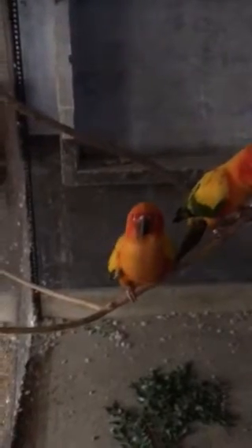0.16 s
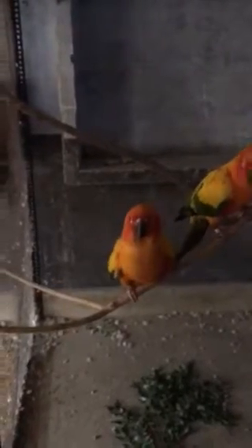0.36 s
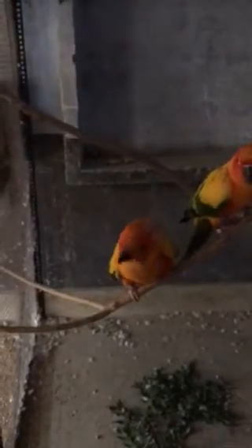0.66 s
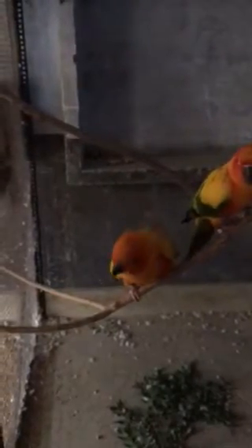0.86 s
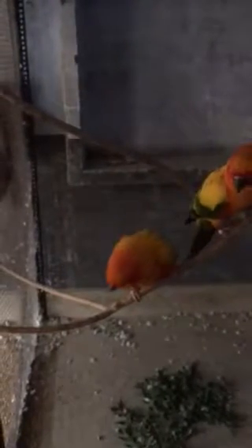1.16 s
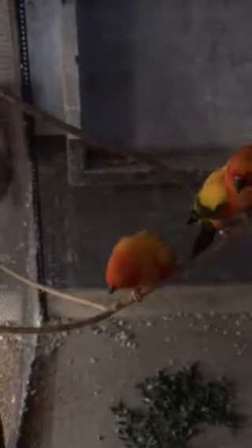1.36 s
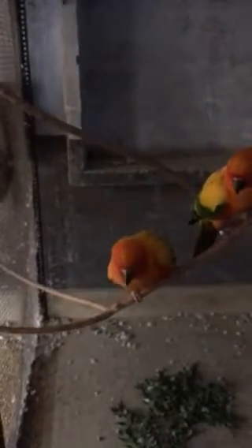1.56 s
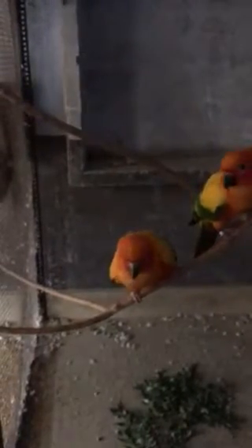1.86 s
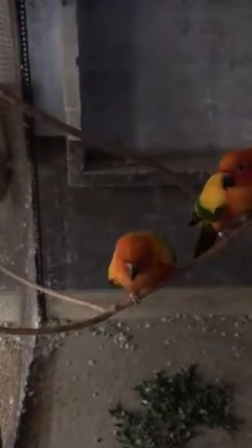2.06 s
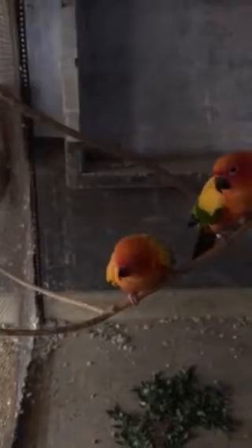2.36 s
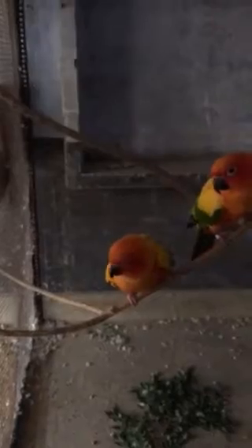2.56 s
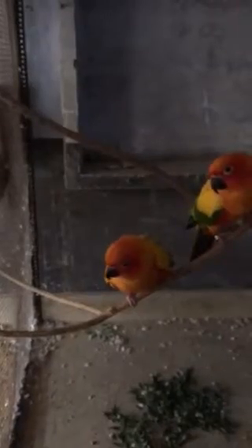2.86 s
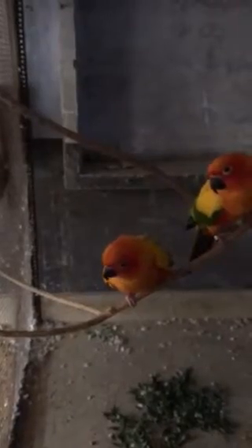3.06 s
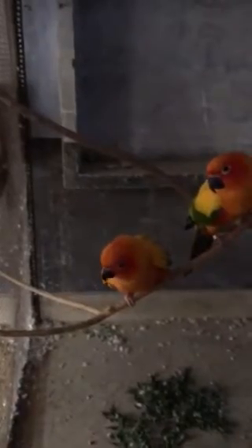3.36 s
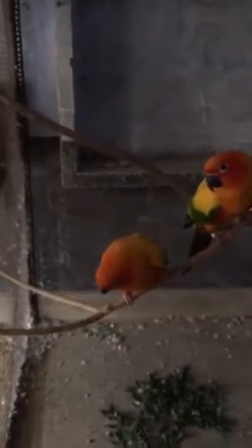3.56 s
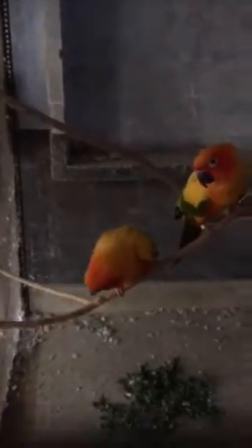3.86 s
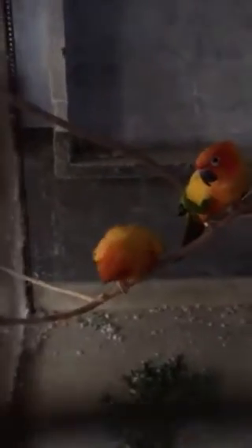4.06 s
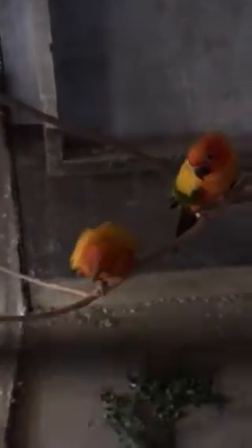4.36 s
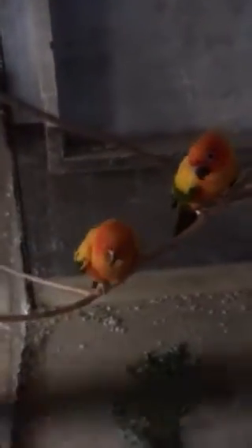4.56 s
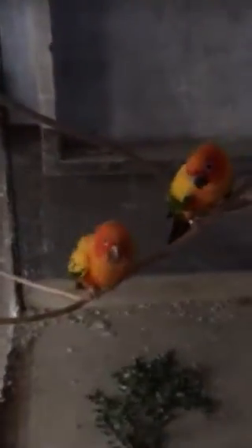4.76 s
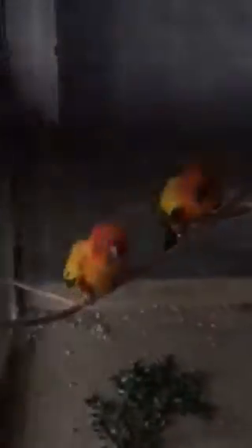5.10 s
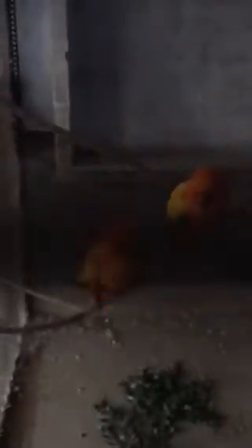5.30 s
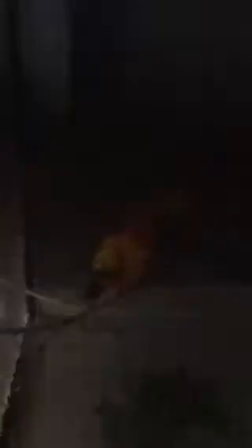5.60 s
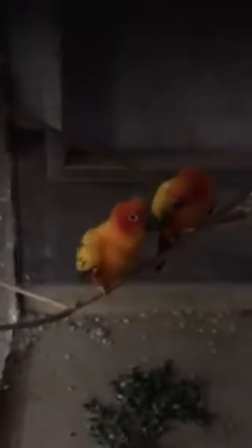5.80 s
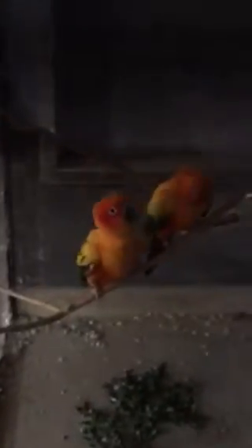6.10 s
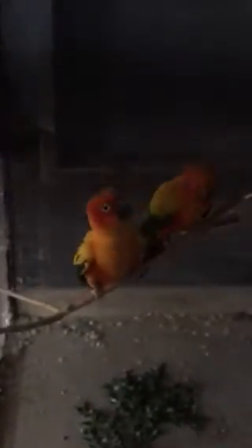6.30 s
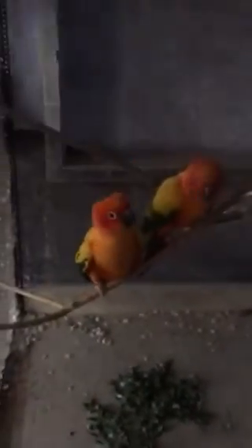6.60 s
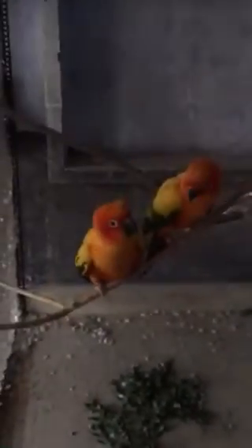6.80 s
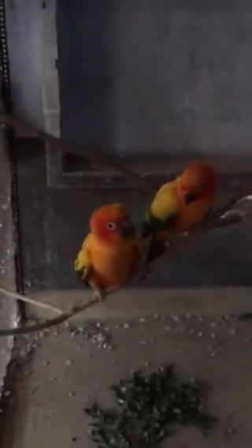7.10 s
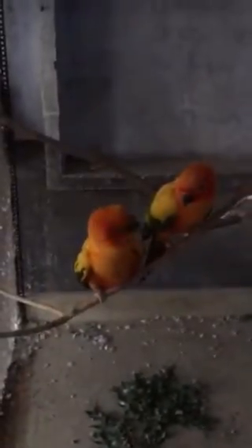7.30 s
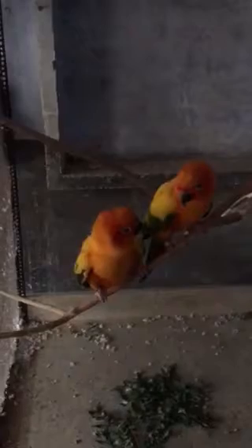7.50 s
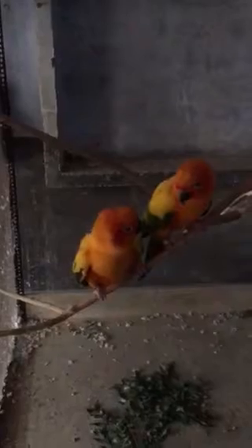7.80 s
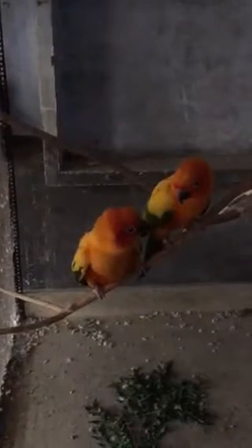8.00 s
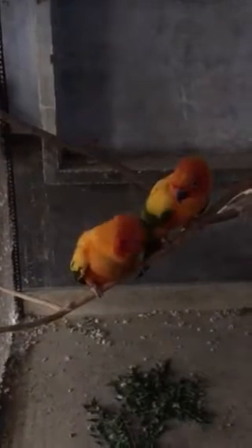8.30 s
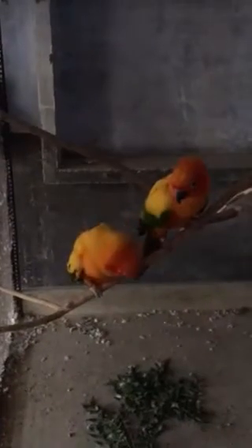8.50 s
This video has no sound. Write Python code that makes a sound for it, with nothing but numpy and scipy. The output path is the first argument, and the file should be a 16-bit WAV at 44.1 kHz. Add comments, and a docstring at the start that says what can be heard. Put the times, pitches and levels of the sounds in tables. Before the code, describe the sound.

Two conures call in a hard-walled enclosure inside an echoing building, over soft moving air, uneven low rumble and faint motor hum. A call's dying end opens, with faint mutters at 0.2 and 0.6 s. A piercing squawk cracks at 1.3, another with high chirps at 1.65, and a rough one at 2.0. A sharp beak click at 2.75 precedes a squawk; more follow at 3.05 to 3.45. From 3.8 to 4.3 calls crowd together, with a nasal yap and a clear rising whistle. After a lull, squawks and chirps burst at 5.4 to 5.55. A stuttering low croak at 5.9 leads into soft mutters and falling mews until 6.95, broken by a squawk at 6.35. Bright screeches hit at 7.0, a whistle rises at 7.2, and harsh calls follow at 7.4 to 7.7. Two buzzy yaps come near 8.0, then reverberation fades, with a faint click at 8.5.

```python
"""In a hard-walled enclosure inside an echoing building, two conures chatter on a perch over ventilation.
Squawks, chirps, yaps and small talk are harmonic pulses, shaken by roughness, breathed on and throat-filtered.
Two rising whistles are nearly pure slurs; a stuttering croak is a run of low bursts; beak clicks are ringing noise.
Filtered noise makes the moving air and duct rumble, and wavering sines make the hum."""
import sys
import numpy as np
from scipy import signal
from scipy.fft import rfft, irfft, next_fast_len
from scipy.io import wavfile
from scipy.ndimage import map_coordinates

SR = 44100
rng = np.random.default_rng(int(sys.argv[2]) if len(sys.argv) > 2 else 0)


def int16_out(signal):
    """Quantize to a 16-bit WAV file."""
    q = np.round(np.clip(np.atleast_2d(signal).T, -1, 1) * 32767)
    wavfile.write(sys.argv[1], SR, q.astype(np.int16))


N = 381465
TIME = np.arange(N) / SR


def from_db(db):
    """Decibels to gain."""
    return 10 ** (np.asarray(db) / 20)


def rms_one(x):
    """Scale to unit rms."""
    return x / np.sqrt(np.mean(x ** 2) + 1e-20)


def at_hz(points, hz):
    """Read a table on a log-frequency axis."""
    table = np.array(points)
    return np.interp(np.log(np.maximum(hz, 1)), np.log(table[:, 0]), table[:, 1])


def level_curve(points):
    """Gain in dB over the whole scene, in straight lines between the table's times."""
    return np.interp(TIME, *np.transpose(points))


def colour(x, db_at):
    """Filter by a gain in dB given as a function of frequency."""
    size = next_fast_len(len(x))
    hz = np.arange(size // 2 + 1) * SR / size
    return irfft(rfft(x, size) * from_db(db_at(hz)), size)[:len(x)]


def low_cut_db(hz, edge_hz, order):
    """Slope of a high-pass in dB."""
    return -10 * np.log10(1 + (edge_hz / np.maximum(hz, 1)) ** (2 * order))


def waver(size, rate):
    """Smooth random drift of spread 1, changing about rate times a second."""
    knots = rng.standard_normal(16384)
    return map_coordinates(knots, [np.arange(size) * rate / SR], order=3, mode="wrap")


def add(out, start, sound):
    """Mix a sound in at its time in seconds."""
    at = max(round(start * SR), 0)
    out[at:at + len(sound)] += sound[:N - at]


# tone of the moving air: f/Hz, gain/dB
AIR_SPECTRUM = [(15, -38), (25, -7), (99, 3), (133, -8), (198, -10.5), (227, -13.5), (322, -13), (848, -22),
                (1300, -24), (2060, -30), (2770, -32.5), (3630, -35), (4040, -36), (8810, -43.5),
                (15500, -51)]
# course of the moving air, before its trim: t/s, level/dB
AIR_COURSE = [(0, -50), (6.55, -51.5), (6.7, -45.5), (7.4, -52.5), (8.65, -51.5)]
# rough, irregular level of the low rumble: t/s, level/dB
RUMBLE_COURSE = [(0.0, -56), (1.16, -48), (1.2, -44), (1.59, -62), (2.36, -48.5), (2.43, -62), (3.06, -56),
                 (3.13, -75), (4.26, -60), (7.76, -67), (8.12, -56), (8.65, -60)]
# partials of the motor hum, about which each wavers: f/Hz, level/dB
HUM_PARTIALS = [(51, -65.5), (100.3, -55.5), (200, -64)]


def ventilation(air_trim_db=3, rumble_hz=72, hum_waver_db=3.5, hum_waver_rate=9, hum_slip_rad=0.85):
    """Broad noise of moving air, a low noise band in the duct, and a motor hum unsteady in level and phase."""
    hiss = rng.standard_normal(N)
    air = rms_one(colour(hiss, lambda hz: at_hz(AIR_SPECTRUM, hz) + low_cut_db(hz, 109.8, order=3)))
    air = air * from_db(air_trim_db + level_curve(AIR_COURSE))

    duct = signal.butter(2, [0.57 * rumble_hz, rumble_hz], "band", fs=SR, output="sos")
    rumble = rms_one(signal.sosfilt(duct, rng.standard_normal(N)))
    rumble = rumble * from_db(level_curve(RUMBLE_COURSE))

    hum = np.zeros(N)
    for hz, level_db in HUM_PARTIALS:
        gain = from_db(level_db + hum_waver_db * waver(N, hum_waver_rate))
        slip = hum_slip_rad * waver(N, hum_waver_rate)
        hum += gain * rms_one(np.sin(2 * np.pi * hz * TIME + slip))
    return air + rumble + hum


# ring of the building, time to fall 60 dB: f/Hz, t60/s
HALL_RING = [(1000, 2.4), (2500, 1.19), (4000, 0.91), (6000, 0.82), (9000, 0.59), (15000, 0.29)]


def enclosure(near_db=-2, near_t60=0.23, near_gap_s=.002, echoes_per_s=2500, hall_db=-7, hall_build_s=0.0077):
    """Echo response: quick reflections off the near walls, then the building's long tail, dying sooner in the treble."""
    t = TIME[:2 * SR]
    sparse = rng.standard_normal(len(t)) * (rng.random(len(t)) < echoes_per_s / SR)
    near = sparse * (t > near_gap_s) * from_db(-60 * t / near_t60)

    # the tail is noise split into bands, each with its own decay
    white = rfft(rng.standard_normal(len(t)))
    hz = np.arange(len(white)) * SR / len(t)
    edges = np.geomspace(500, 20000, 15)
    hall = np.zeros(len(t))
    for low, high in zip(edges, edges[1:]):
        band = irfft(white * ((hz >= low) & (hz < high)))
        hall += band * from_db(-60 * t / at_hz(HALL_RING, np.sqrt(low * high)))
    hall = hall * (1 - np.exp(-t / hall_build_s))
    return (from_db(near_db) * rms_one(near) + from_db(hall_db) * rms_one(hall)) / np.sqrt(len(t))


# beak clicks, level at the onset: t/s, level/dB
BEAK_CLICKS = [(2.755, -23), (2.759, -22), (8.519, -45)]
# ring of the beak: f/Hz, gain/dB
BEAK_SPECTRUM = [(1000, -45), (3500, -16), (4800, -17), (5700, -3.5), (6250, -1.5), (7400, -21),
                 (10000, -29), (12500, -15), (15500, -28)]


def beak_clicks(t60=0.022):
    """The horn of the beak snaps and rings for a moment: coloured noise with a fast decay."""
    out, t = np.zeros(N), TIME[:SR // 20]
    for start, level_db in BEAK_CLICKS:
        snap = rms_one(colour(rng.standard_normal(len(t)), lambda hz: at_hz(BEAK_SPECTRUM, hz)))
        add(out, start, from_db(level_db - 60 * t / t60) * snap)
    return out


def syrinx(pitch):
    """Pulses of the vibrating membranes: up to 14 equal harmonics."""
    phase = 2 * np.pi * np.cumsum(pitch) / SR
    return rms_one(sum(np.sin(k * phase) * (k * pitch < SR / 2) for k in range(1, 15)))


# throat of the croak: f/Hz, gain/dB
CROAK_SPECTRUM = [(700, -2), (1100, -0.5), (2300, 5.5), (3100, -4.5), (3900, 2.5), (5500, -11),
                  (7000, -21.5), (14000, -39)]
# starts of the first and last burst, and the exponent that spreads out the later ones
CROAK_START_S, CROAK_END_S, CROAK_SLOWING = 5.908, 5.967, 1.2
CROAK_FIRST_BURST_S, CROAK_LAST_BURST_S = 0.003, .015
CROAK_HZ, CROAK_SAG_OCT = 1243, 0.196
# the level peaks at the crest, a fraction of the run, and falls off with the square of the distance
CROAK_DB, CROAK_CREST, CROAK_FADE_DB = -25, 0.45, 4.5


def croak(jitter=0.08, jitter_rate=1200, count=5):
    """Short low bursts, each starting abruptly; the run slows, sags in pitch, swells and fades."""
    out = np.zeros(N)
    for along in np.linspace(0, 1, count):
        start = CROAK_START_S + (CROAK_END_S - CROAK_START_S) * along ** CROAK_SLOWING
        size = int(np.interp(along, [0, 1], [CROAK_FIRST_BURST_S, CROAK_LAST_BURST_S]) * SR)
        level_db = CROAK_DB - CROAK_FADE_DB * (along - CROAK_CREST) ** 2
        pitch = CROAK_HZ * 2 ** (-CROAK_SAG_OCT * along)
        pulses = syrinx(pitch * (1 + jitter * waver(size, jitter_rate)))
        voice = rms_one(colour(pulses, lambda hz: at_hz(CROAK_SPECTRUM, hz)))
        burst = np.interp(np.linspace(0, 1, size), [0, .06, .75, 1], [0.16, 0.91, 0.82, 0.33])
        add(out, start, from_db(level_db) * voice * burst)
    return out


# rising whistles, level before the fades and room mix: t/s, top f/Hz, level/dB
RISING_WHISTLES = [(4.268, 2813, -28.5), (7.220, 3005, -23.5)]
# overtones 2 to 5 of a whistle before strain: level/dB relative to the fundamental
OVERTONES_DB = [-19, -28, -40, -35]
WHISTLE_RISE_S, WHISTLE_DROOP_S = .143, 0.0475
WHISTLE_RISE_OCT, WHISTLE_DROOP_OCT = .47, 0.225


def whistles(jitter=0.02, jitter_rate=300, attack_s=0.04, release_s=0.034, rise_ease=1.45,
             strain_db_per_oct=25, easy_hz=3000):
    """Nearly pure upward slurs that level off and droop; overtones open up as the pitch is strained higher."""
    out = np.zeros(N)
    t = np.arange(0, WHISTLE_RISE_S + WHISTLE_DROOP_S, 1 / SR)
    rise = WHISTLE_RISE_OCT * np.maximum(1 - t / WHISTLE_RISE_S, 0) ** rise_ease
    droop = WHISTLE_DROOP_OCT * np.maximum((t - WHISTLE_RISE_S) / WHISTLE_DROOP_S, 0) ** 2
    fade = np.clip(np.minimum(t / attack_s, (t[-1] - t) / release_s), 0, 1)
    for start, top_hz, level_db in RISING_WHISTLES:
        hz = top_hz * 2 ** -(rise + droop)
        phase = 2 * np.pi * np.cumsum(hz * (1 + jitter * waver(len(t), jitter_rate))) / SR
        overtones = sum(from_db(db) * np.sin(k * phase) for k, db in enumerate(OVERTONES_DB, 2))
        strain = from_db(strain_db_per_oct * np.log2(hz / easy_hz))
        tone = rms_one(np.sin(phase) + overtones * strain)
        add(out, start, tone * fade * from_db(level_db))
    return out


# fixed colour of the throat: f/Hz, gain/dB
THROAT_SPECTRUM = [(1300, -2.5), (1750, 0), (2400, 0), (3300, 2), (4500, 3), (6700, 0), (7600, -7),
                   (9600, -3), (10500, -8.5), (12500, -1.5), (14200, -12.5), (15800, -19)]


def syllable(length, level_db, pitch_hz, glide, rough, throat_hz, throat_db, treble_db,
             jitter=.06, jitter_rate=1000, wobble=.10, wobble_rate=140, flutter_db=3.5, flutter_rate=400,
             lock_rate=80, leak=0.44, resonance_width_hz=700, treble_edge_hz=6000,
             attack_s=0.021, swell=0.55, release=0.26):
    """One note; pressed hard, the syrinx turns chaotic: pitch and strength shake, harmonics smear into a screech."""
    size = int(length * SR)
    along = np.linspace(0, 1, size)
    pitch = pitch_hz * 2 ** (glide * (along - .5))
    # the membranes slip in and out of regular vibration
    chaos = rough * np.clip(1 + waver(size, lock_rate), 0, 2)
    shake = chaos * jitter * waver(size, jitter_rate) + rough * wobble * waver(size, wobble_rate)
    pulses = syrinx(pitch * np.exp(shake))
    # turbulent air escapes with every opening
    hiss = rms_one(rng.standard_normal(size) * np.sqrt(np.abs(pulses)))

    def throat_gain_db(hz):
        """Fixed colour, one movable resonance, a treble slope and a steep cut below the pitch."""
        resonance = throat_db / (1 + ((hz - throat_hz) / resonance_width_hz) ** 2)
        treble = treble_db * np.log2(np.maximum(hz / treble_edge_hz, 1))
        return at_hz(THROAT_SPECTRUM, hz) + resonance + treble + low_cut_db(hz, 0.92 * pitch.min(), order=12)

    voice = colour(pulses + (leak + .5 * chaos) * hiss, throat_gain_db)
    voice = rms_one(voice * from_db(flutter_db * rough * waver(size, flutter_rate)))
    # air pressure builds up to the crest, then drops, fastest at the very end
    crest = min(attack_s / length, .55)
    pressure = np.interp(along, [0, crest, 1], [0, 1, 0]) ** np.where(along < crest, swell, release)
    return from_db(level_db) * pressure * voice


# In all the call tables below, level is before the pressure envelope and room mix, and f is the mid-note pitch.
# soft rising mutters through a closed beak: t/s, level/dB, f/Hz, glide/octaves, roughness (0 = clear)
SOFT_MUTTERS = [(0.162, -45, 1097, 0.064, 0.85), (0.585, -45.5, 999, 0.055, .9),
                (6.055, -42, 1130, 0.13, .8), (6.178, -43, 1200, 0.067, 0.9), (6.548, -39, 1503, .42, 0.3),
                (6.800, -38.5, 1417, 0.21, .3)]
MUTTER_S, MUTTER_FOCUS_DB, MUTTER_TREBLE_DB_PER_OCT = 0.072, 13.5, -30
# soft, clear falling mews: t/s, level/dB, f/Hz, glide/octaves
SOFT_MEWS = [(6.417, -38.5, 1617, -0.21), (6.648, -35, 1743, -.17), (6.898, -36.5, 1752, -0.22)]
MEW_S, MEW_ROUGH, MEW_FOCUS_DB, MEW_TREBLE_DB_PER_OCT = .066, .13, 0.5, -27


def small_talk():
    """Quiet, dull notes: mutters rise, mews fall; the throat follows the second harmonic."""
    out = np.zeros(N)
    for start, level_db, pitch_hz, glide, rough in SOFT_MUTTERS:
        add(out, start, syllable(MUTTER_S, level_db, pitch_hz, glide, rough, 2 * pitch_hz,
                                 MUTTER_FOCUS_DB, MUTTER_TREBLE_DB_PER_OCT, treble_edge_hz=4200))
    for start, level_db, pitch_hz, glide in SOFT_MEWS:
        add(out, start, syllable(MEW_S, level_db, pitch_hz, glide, MEW_ROUGH, 2 * pitch_hz,
                                 MEW_FOCUS_DB, MEW_TREBLE_DB_PER_OCT, leak=0.33, treble_edge_hz=5150))
    return out


# nasal yaps, all on one pitch with a strong third harmonic: t/s, length/s, level/dB
NASAL_YAPS = [(4.173, 0.038, -27), (7.966, 0.032, -40.5), (8.019, .080, -26.5)]
YAP_HZ, YAP_GLIDE_OCT, YAP_ROUGH = 1316, -.11, 0.379
YAP_THROAT_HZ, YAP_FOCUS_DB, YAP_TREBLE_DB_PER_OCT = 4090, 16, -44


def yaps():
    """Low, buzzy notes, full up to a steep treble edge; the throat rings near the third harmonic."""
    out = np.zeros(N)
    for start, length, level_db in NASAL_YAPS:
        add(out, start, syllable(length, level_db, YAP_HZ, YAP_GLIDE_OCT, YAP_ROUGH, YAP_THROAT_HZ, YAP_FOCUS_DB,
                                 YAP_TREBLE_DB_PER_OCT, treble_edge_hz=10400, attack_s=0.01))
    return out


# clear notes, many of them inside a squawk; the first row is the dying end of a call already under way:
# t/s, length/s, level/dB, f/Hz, glide/octaves, gain around the second harmonic/dB (negative dulls it)
CLEAR_CHIRPS = [ (0.000, .060, -40, 1431, -.05, 10.5), (1.332, .018, -26, 3590, 0.0063, 23),
                (1.644, 0.043, -27, 2150, .015, 1.5), (1.686, 0.039, -24, 5016, -0.0063, 10.5),
                (3.033, .020, -34, 2420, 0.079, -2), (5.387, 0.039, -25, 2402, -0.048, 5.5),
                (5.494, 0.044, -35.5, 3330, -0.14, -11), (5.548, 0.029, -31, 1927, -0.14, -7),
                (5.553, 0.021, -27.5, 3300, 0.0048, 28), (7.046, 0.014, -20.5, 3260, -0.051, 26),
                (7.475, .043, -27.5, 3350, 0.048, 26), (7.507, 0.036, -28, 3670, .17, 3),
                (7.625, 0.1, -30.5, 2203, .22, 24), (8.032, 0.044, -31.5, 2510, -0.037, -8)]
CHIRP_ROUGH, CHIRP_TREBLE_DB_PER_OCT = 0.142, -9


def chirps():
    """The membranes vibrate almost regularly; the throat boosts or dulls the second harmonic."""
    out = np.zeros(N)
    for start, length, level_db, pitch_hz, glide, second_db in CLEAR_CHIRPS:
        add(out, start, syllable(length, level_db, pitch_hz, glide, CHIRP_ROUGH, 2 * pitch_hz, second_db,
                                 CHIRP_TREBLE_DB_PER_OCT, attack_s=0.017))
    return out


# harsh squawks: t/s, length/s, level/dB, f/Hz, glide/octaves, roughness (0 = clear), throat resonance f/Hz
HARSH_SQUAWKS = [ (1.299, 0.025, -27.5, 2600, -0.0064, 1.02, 4600),
                 (1.312, 0.029, -19.5, 2567, -0.000077, 1.02, 5950),
                 (1.632, 0.025, -33.5, 2300, 0.032, 0.87, 4300), (1.665, 0.054, -24.5, 2392, 0, 0.98, 4980),
                 (2.031, 0.042, -27.5, 2200, -0.13, 0.95, 4230),
                 (2.818, 0.046, -25.5, 2076, -0.1, .85, 4000),
                 (3.049, 0.087, -26.5, 2400, -0.062, 0.79, 6900), (3.137, .045, -27.5, 2440, 0, 1.13, 4170),
                 (3.328, .026, -34.5, 2080, 0.034, 0.55, 4100),
                 (3.463, 0.018, -36, 2102, 0.063, 0.35, 6600), (3.790, 0.065, -31.5, 2434, 0.096, .7, 2600),
                 (3.844, 0.09, -26.5, 2546, -0.045, .4, 5200), (4.145, 0.12, -27, 2607, -0.074, 0.54, 2530),
                 (4.248, .044, -25.5, 2280, -.13, 0.85, 5550), (5.372, 0.021, -32, 2620, -.15, 0.3, 5350),
                 (5.517, .050, -24, 2447, -0.27, 0.74, 5700),
                 (6.346, 0.049, -23.5, 2603, -0.19, 0.86, 5950),
                 (7.013, 0.045, -22.5, 2797, -0.41, 0.83, 5310), (7.079, 0.039, -21.5, 2407, 0, 1.37, 5600),
                 (7.411, 0.12, -22, 2510, 0.044, 1.05, 5750), (7.551, 0.087, -24.5, 2722, 0.14, 0.59, 5600)]
EASY_DB, EASY_TREBLE_DB_PER_OCT = -28.5, -6   # above this level the bird strains
# strain sharpens the throat resonance and lifts the treble slope, per dB above the easy level
FOCUS_DB_PER_DB, TREBLE_DB_PER_DB = 1.93, 0.95


def squawks():
    """Rough calls: the harder the bird strains, the more piercing and bright."""
    out = np.zeros(N)
    for start, length, level_db, pitch_hz, glide, rough, throat_hz in HARSH_SQUAWKS:
        strain_db = max(level_db - EASY_DB, 0)
        focus_db = FOCUS_DB_PER_DB * strain_db
        treble_db = EASY_TREBLE_DB_PER_OCT + TREBLE_DB_PER_DB * strain_db
        add(out, start, syllable(length, level_db, pitch_hz, glide, rough, throat_hz, focus_db, treble_db,
                                 resonance_width_hz=780, attack_s=0.029, swell=0.64))
    return out


def scene(call_direct_db=-3, croak_echo_db=-8, click_echo_db=-3):
    """The calls fill the room; the croak and clicks arrive drier, and the ventilation gets no added echo."""
    calls = squawks() + chirps() + yaps() + small_talk() + whistles()
    croaks, clicks = croak(), beak_clicks()
    into_room = calls + from_db(croak_echo_db) * croaks + from_db(click_echo_db) * clicks
    echoes = signal.fftconvolve(into_room, enclosure())[:N]
    direct = from_db(call_direct_db) * calls + croaks + clicks
    return (direct + echoes + ventilation())[None]


def record(dry, cutoff_hz=15850):
    """A steep low-pass cuts off the top."""
    low_pass = signal.ellip(12, .1, 80, cutoff_hz, fs=SR, output="sos")
    return signal.sosfilt(low_pass, dry)


dry = scene()
out = record(dry)
int16_out(out)
```